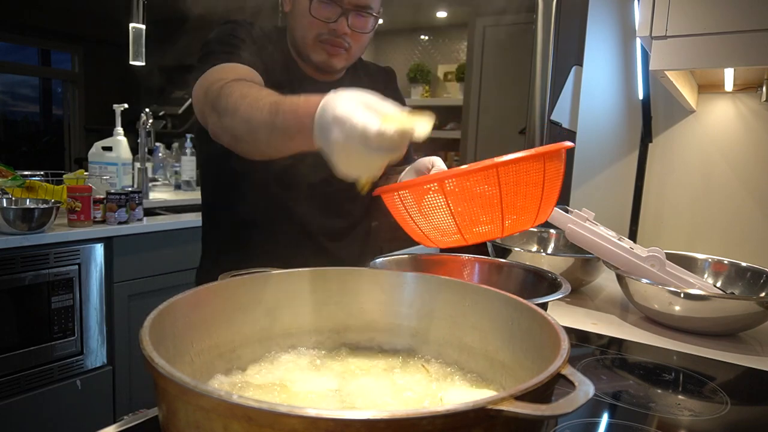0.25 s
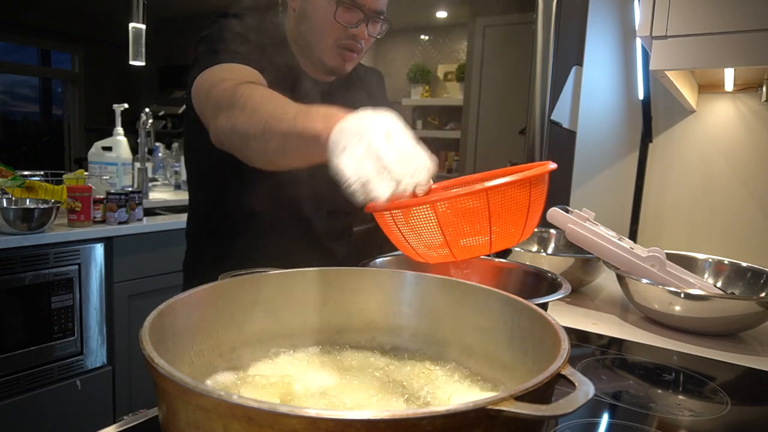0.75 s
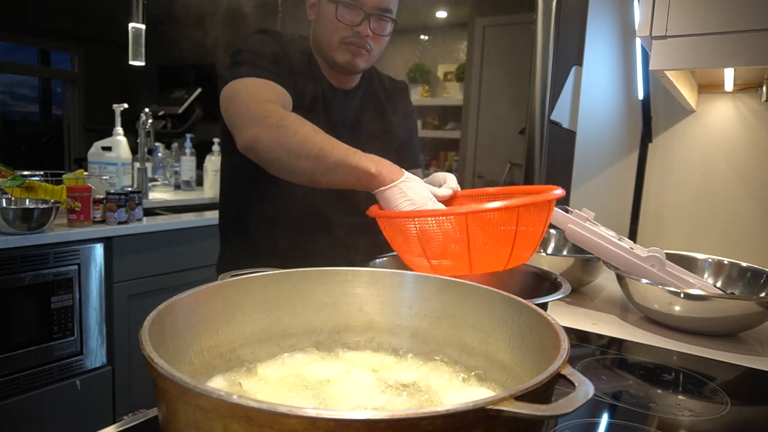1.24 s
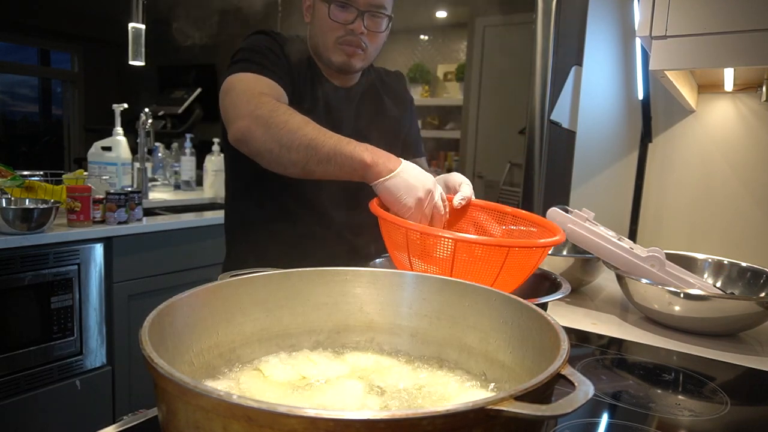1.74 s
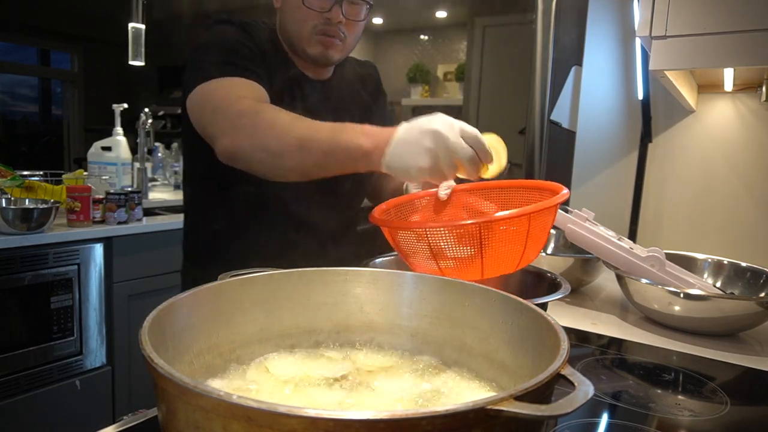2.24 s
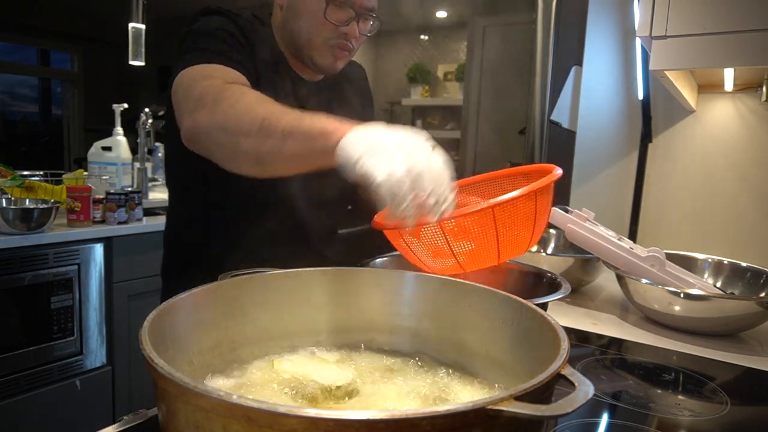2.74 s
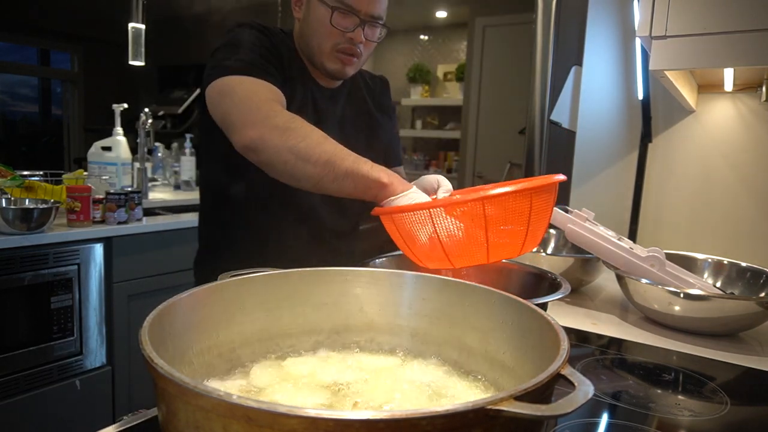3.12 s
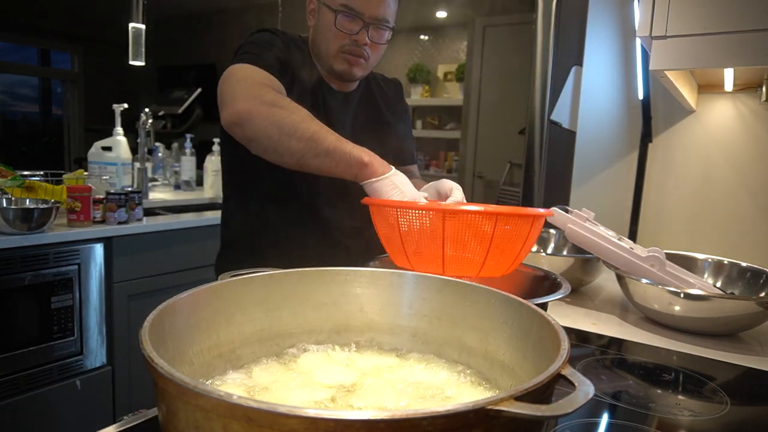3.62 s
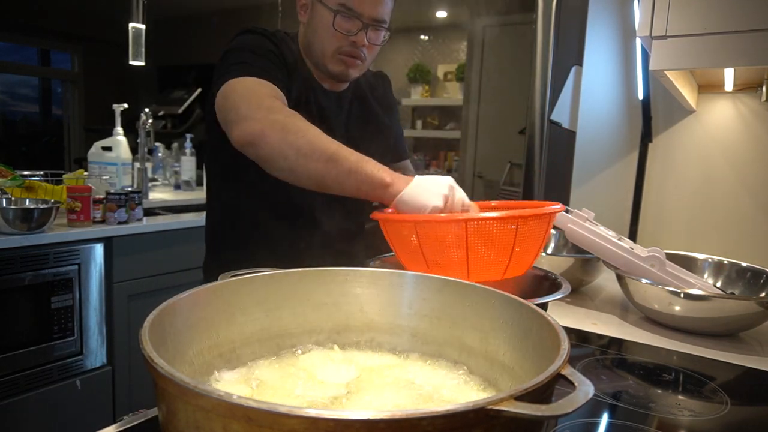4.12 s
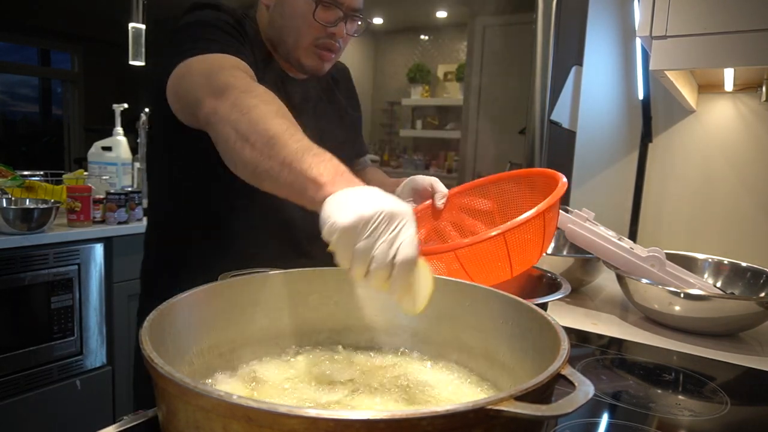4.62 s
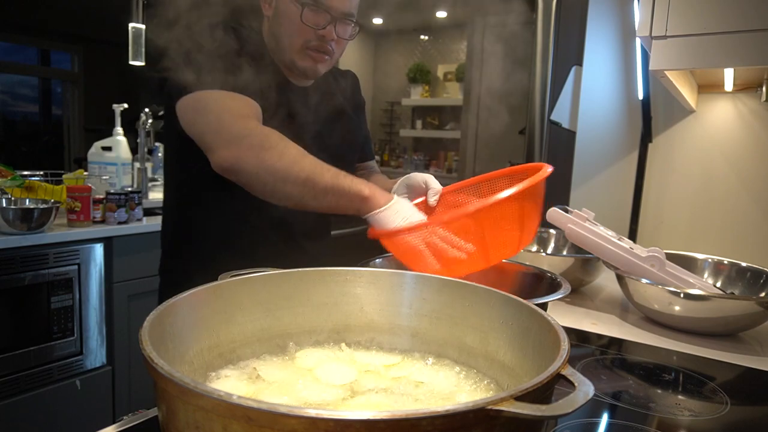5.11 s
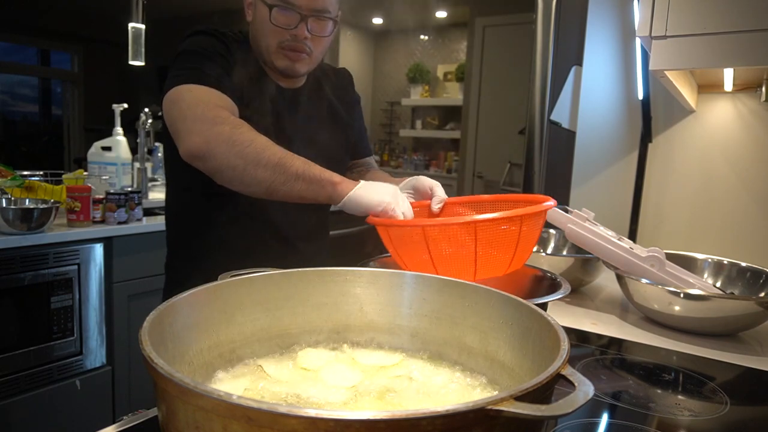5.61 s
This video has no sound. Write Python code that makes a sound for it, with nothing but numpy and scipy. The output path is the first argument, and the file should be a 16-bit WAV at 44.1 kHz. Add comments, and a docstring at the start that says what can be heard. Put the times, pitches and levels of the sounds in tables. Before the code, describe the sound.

Hot oil sizzles and bubbles steadily around potato slices in a metal pot, crackling and spitting close by over a faint rumble.

```python
"""Hot oil fries potato slices in a wide metal pot in a home kitchen.
Steam bubbles burst at the surface: large ones glug, middling ones plip and pop, the smallest fizz.
Steam pockets gulp up from under the slices and water drops spit. Pot and room ring with the bursts,
over a faint stove rumble. A limiter ducks the sizzle briefly on the loudest bursts."""
import sys
import numpy as np
from scipy import signal
from scipy.fft import rfft, irfft, next_fast_len
from scipy.io import wavfile
from scipy.ndimage import uniform_filter1d, minimum_filter1d

SR = 44100
rng = np.random.default_rng(int(sys.argv[2]) if len(sys.argv) > 2 else 0)


def wrap_up_sound(samples):
    """Save the sound to the file named by the first command line argument, as 16-bit audio."""
    columns = np.atleast_2d(samples).T
    # keep every value between -1 and 1, then stretch to whole-number steps
    tamed = np.clip(columns, -1, 1)
    steps = np.round(tamed * 32767).astype(np.int16)
    wavfile.write(sys.argv[1], SR, steps)


N = 258426
TIME_S = np.arange(N) / SR
FFT_SIZE = next_fast_len(N + SR)
FREQS_HZ = np.maximum(np.fft.rfftfreq(FFT_SIZE, 1 / SR), 1)


def from_db(db):
    return 10 ** (np.asarray(db) / 20)


def unit_rms(x):
    return x / np.sqrt(np.mean(x ** 2) + 1e-20)


def curve_db(points):
    """Rows of (Hz, dB) interpolated over log frequency."""
    hz, db = np.transpose(points)
    return np.interp(np.log(FREQS_HZ), np.log(hz), db)


def filtered(x, gain):
    """Apply a gain per frequency."""
    return irfft(rfft(x, FFT_SIZE) * gain, FFT_SIZE)[..., :N]


def drift(corner_hz, hop=40):
    """Slow random wander, rms about 1."""
    pole = np.exp(-2 * np.pi * hop * corner_hz / SR)
    noise = rng.standard_normal(N // hop + 2002)
    slow = signal.lfilter([1], [1, -2 * pole, pole * pole], noise)[2000:]
    return np.interp(np.arange(N) / hop, np.arange(len(slow)), unit_rms(slow))


def add(out, start_s, sound):
    at = max(0, round(start_s * SR))
    out[:, at:at + sound.shape[1]] += sound[:, :N - at]


def scattered(low_hz, high_hz, count):
    """One random burst per equal time slot. Each row: start in seconds, pitch in Hz, size 0-1."""
    offset, pitch, size = rng.random((count, 3)).T
    start_s = (np.arange(count) + offset) / count * TIME_S[-1]
    return np.transpose([start_s, low_hz * (high_hz / low_hz) ** pitch, size])


# Air resonances of the pot. Each row: centre in Hz, width in Hz, gain in dB.
POT_MODES = [(230, 50, 3.5), (317, 26, 5.5), (374.4, 22.7, 9.5), (836.4, 45, 14.5), (1068, 97, 13.5),
             (1300, 28, 9.5), (1285, 32, 13), (1440, 38, -2.5), (2840, 26, -3), (4074, 260, -1),
             (7540, 320, 1)]


def pot_air():
    """Complex gain of the air in the pot: each resonance lifts or dips a narrow band and rings on."""
    return 1 + sum((from_db(db) - 1) / (1 + 1j * hz / width_hz * (FREQS_HZ / hz - hz / FREQS_HZ))
                   for hz, width_hz, db in POT_MODES)


# Broad colour of the sizzle. Each row: frequency in Hz, gain in dB.
SIZZLE_COLOUR = [(230, -3.5), (400, -6), (590, -3), (720, -17.5), (1150, -20), (1400, -9.5), (1900, -4.5),
                 (2900, -7.5), (4000, -6.5), (5600, -19), (7300, -15), (8700, -20.5), (11000, -20.5),
                 (15500, -22.5)]


def bubble_swarm(low_hz, high_hz, per_s, size_db, cycles, surge_db, spread, pitches):
    """Bubbles of random size, pitch and place burst and ring in the pot; rms 1."""
    at = np.flatnonzero(rng.random(N) < per_s / SR)
    burst_db = size_db * np.minimum(rng.exponential(1, N), 3.2) + surge_db
    size = from_db(burst_db[at]) * rng.choice([-1, 1], N)[at]
    pan = spread * rng.standard_normal(N)[at]
    pitch_index = rng.integers(0, pitches, N)[at]
    out = np.zeros((2, N))
    for k, hz in enumerate(np.geomspace(low_hz, high_hz, pitches)):
        own = pitch_index == k
        clicks = np.full((2, N), 1e-18)
        clicks[:, at[own]] = size[own] * np.array([1 + pan[own], 1 - pan[own]])
        radius, angle = from_db(-60 * hz / (cycles * SR)), 2 * np.pi * hz / SR
        ring = signal.lfilter([1, 0, -1], [1, -2 * radius * np.cos(angle), radius * radius], clicks)
        out += hz * ring  # small bubbles die sooner, so they start stronger
    return unit_rms(filtered(out, from_db(curve_db(SIZZLE_COLOUR)) * pot_air()))


# How hard the oil boils. Each row: time in seconds, vigour in dB about the usual.
BOIL_VIGOUR = [(0.0, -0.5), (0.4, -3), (1.65, -0.8), (2.05, 0), (2.5, -2.5), (3.0, 1.6), (3.95, -1.5),
               (4.45, 2), (5.1, 1.5), (5.5, 2.2), (5.86, 2.3)]
# Wet slices landing in the oil. Each row: start in seconds, peak change of the fizz in dB.
SLICE_DROPS = [(0.72, 3), (2.62, 0.7), (4.85, -1.5)]


def boiling(glug_db=-25, plip_db=-21, fizz_db=-27.5, flare_rise_s=0.16):
    """Glugs, plips and fizz follow the boil and surge together; the fizz flares or dips as slices land."""
    vigour_db = np.interp(TIME_S, *np.transpose(BOIL_VIGOUR))
    flare_db = 0
    for start_s, change_db in SLICE_DROPS:
        age = np.maximum(TIME_S - start_s, 0) / flare_rise_s
        flare_db += change_db * age * np.exp(1 - age)
    surge = drift(22)
    glugs = bubble_swarm(229, 1092, per_s=1200, size_db=2, cycles=13.3,
                         surge_db=1.4 * surge + 0.82 * drift(27), spread=0.51, pitches=16)
    plips = bubble_swarm(1069, 6150, per_s=3400, size_db=3, cycles=29.4,
                         surge_db=1.34 * surge, spread=0.58, pitches=40)
    fizz = bubble_swarm(4710, 15400, per_s=15000, size_db=3, cycles=19.7,
                        surge_db=1.2 * surge, spread=0.83, pitches=22)
    return (from_db(glug_db + vigour_db) * glugs
            + from_db(plip_db + 0.29 * vigour_db) * plips
            + from_db(fizz_db + 0.85 * vigour_db + flare_db) * fizz)


# Spectrum of the rumble. Each row: frequency in Hz, gain in dB.
RUMBLE_COLOUR = [(15, -20), (32, -9), (45, 3), (62, -11), (90, -7), (135, 0), (180, -9), (400, -26)]


def stove_rumble(level_db=-46, wander_db=2):
    """Low, wavering noise of stove and kitchen."""
    noise = filtered(rng.standard_normal(N), from_db(curve_db(RUMBLE_COLOUR)))
    return unit_rms(noise) * from_db(level_db + wander_db * drift(10))


def bubble(t, hz, cycles, rise=0.081, opening_cycles=0.27):
    """A cavity rings, falling 60 dB over `cycles`; the pitch climbs as the hole in its film widens."""
    turns = hz * np.maximum(t, 0)
    envelope = (1 - np.exp(-turns / opening_cycles)) * np.exp(-np.log(1000) * turns / cycles)
    glide = 1 + rise * (np.tanh(turns / cycles) - 0.2)
    return envelope / (envelope.max() + 1e-12) * np.sin(2 * np.pi * turns * glide)


def pop(t, hz, cycles, snap_db=-9, snap_hz=3300, snap_cycles=4):
    """A bubble's film tears with a short snap, and its cavity rings."""
    return bubble(t, hz, cycles) + from_db(snap_db) * bubble(t, snap_hz, snap_cycles)


def in_kitchen(sound, pan, near_t60_s=0.055, near_db=-0.5, room_t60_s=0.089, room_db=-4.5):
    """A burst reaches each side directly, off pot wall and worktop, then through the room."""
    t = TIME_S[:SR // 5]
    near = np.exp(-np.log(1000) * t / near_t60_s) * (t > 0.002)
    room = np.exp(-np.log(1000) * t / room_t60_s) * (t > 0.012)
    envelope = np.hypot(from_db(near_db) * near / np.linalg.norm(near),
                        from_db(room_db) * room / np.linalg.norm(room))
    paths = envelope * rng.standard_normal((2, len(t)))
    paths[:, 0] += [1 + pan, 1 - pan]
    return signal.fftconvolve(paths, sound[None], axes=1)


def middling_pops(floor_db=-14, range_db=6, rarity=1.9, t60_s=0.009, spread=0.15):
    """Middling bubbles burst all over the oil; most are faint, a few stand out."""
    out, t = np.zeros((2, N)), TIME_S[:SR // 25]
    for start_s, hz, size in scattered(1650, 4320, count=130):
        sound = from_db(floor_db + range_db * size ** rarity) * pop(t, hz, t60_s * hz)
        add(out, start_s, in_kitchen(sound, spread * rng.standard_normal()))
    return out


# The loudest pops, set one by one. Each row: start in seconds, pitch in Hz, relative level in dB.
LOUD_POPS = [(0.142, 1295, -7.5), (0.286, 2640, -10.5), (0.319, 2510, -6), (0.668, 1460, -9.5),
             (0.681, 2020, -9), (0.901, 2050, -10.5), (1.162, 1300, -5.5), (1.176, 2630, -7),
             (1.309, 2680, -6), (1.349, 1700, -9.5), (1.587, 3520, -4.5), (1.677, 1470, -6.5),
             (1.902, 1510, -6.5), (2.118, 3540, -10.5), (2.377, 3440, -4.5), (2.396, 1830, -6),
             (2.432, 2560, -10), (2.542, 2590, -12.5), (2.765, 3480, -12), (3.099, 1270, -10.5),
             (3.152, 2630, -7), (3.33, 1650, -3.5), (3.492, 1870, -4.5), (3.538, 1850, -9),
             (3.618, 1550, -4.5), (3.929, 2000, -9.5), (3.98, 1430, -10), (4.799, 1100, -11.5),
             (4.827, 2730, -9), (5.353, 3300, -10), (5.584, 1720, -2.5), (5.66, 1300, -11)]


def loud_pops(gain_db=3.5, spread=0.084):
    """The loudest bubbles burst one by one; higher ones ring for more cycles."""
    out, t = np.zeros((2, N)), TIME_S[:SR // 25]
    pans = spread * rng.standard_normal(len(LOUD_POPS))
    for (start_s, hz, db), pan in zip(LOUD_POPS, pans):
        sound = pop(t, hz, cycles=24 * (hz / 1500) ** 0.57)
        add(out, start_s, from_db(db + gain_db) * in_kitchen(sound, pan))
    return out


# Steam escaping from under the slices. Each row: start in seconds, pitch in Hz, relative level in dB.
STEAM_POCKETS = [(0.234, 377, -17.5), (0.606, 290, -26), (0.915, 453, -24), (1.02, 735, -20),
                 (1.1, 553, -24.5), (1.424, 1060, -20), (1.836, 540, -19.5), (2.005, 940, -20),
                 (2.221, 600, -25), (2.469, 1190, -19), (2.786, 790, -20), (3.085, 745, -25),
                 (3.692, 1210, -20), (4.012, 1000, -18), (4.05, 306, -22.5), (4.137, 336, -23.5),
                 (4.43, 1150, -19.5), (4.866, 316, -22.5), (4.937, 384, -24)]


def gulps(gain_db=7, cycles=10, breakup_s=0.019, scatter=0.3, climb=0.12, trail_db=-5, count=7):
    """A steam pocket opens with one big bubble, then breaks into a quick run of mostly higher ones."""
    out, t = np.zeros((2, N)), TIME_S[:SR // 8]
    for start_s, hz, db in STEAM_POCKETS:
        lags = (np.arange(count) + 0.5 + rng.random(count)) / count
        trail_hz = hz * np.exp(climb + scatter * rng.permutation(np.linspace(-1.5, 1.5, count)))
        trail = sum(np.exp(-0.6 * lag) * bubble(t - lag * breakup_s, pitch_hz, cycles)
                    for lag, pitch_hz in zip(lags, trail_hz))
        sound = bubble(t, hz, cycles) + from_db(trail_db) * trail
        add(out, start_s, from_db(db + gain_db) * in_kitchen(sound, pan=0))
    return filtered(out, np.sqrt(pot_air()))


# The loudest water drops. Each row: start in seconds, pitch in Hz, level in dB, spray decay in seconds.
WATER_DROPS = [(0.603, 13200, -9, .003), (0.81, 8800, -12, .003), (1.128, 6200, -8, .005),
               (1.148, 13000, -11, .004), (1.471, 10900, -10.5, .007), (1.929, 13000, -11, .003),
               (2.688, 14000, -13, .008), (3.056, 12500, -9, .003), (3.275, 8800, -6.5, .011),
               (3.596, 13700, -12, .004), (4.966, 10400, -7, 0.016), (5.764, 8600, -11.5, .004)]


def spits(cycles=17, band_ratio=1.33, spray_db=-15, spread=0.21, small_db=-17, small_decay_s=0.0045):
    """A drop flashes to steam with a snap and a hiss of oil spray; small drops go off at random."""
    out, t = np.zeros((2, N)), TIME_S[:SR // 12]
    small_drops = [(start_s, hz, small_db + 4 * size, small_decay_s)
                   for start_s, hz, size in scattered(6200, 18000, count=12)]
    for start_s, hz, db, decay_s in list(WATER_DROPS) + small_drops:
        edges_hz = [hz / band_ratio, min(hz * band_ratio, 0.45 * SR)]
        band = signal.butter(2, edges_hz, "band", fs=SR, output="sos")
        hiss = unit_rms(signal.sosfilt(band, rng.standard_normal(len(t))))
        sound = bubble(t, hz, cycles) + from_db(spray_db) * hiss * np.exp(-t / decay_s)
        add(out, start_s, from_db(db) * in_kitchen(sound, spread * rng.standard_normal()))
    return out


# First reflections off pot wall, hob and cupboards. Each row: delay in seconds, gain in dB.
REFLECTIONS = [(.0013, -96), (.0041, -25.5), (.0068, -19.5), (0.011, -19.5), (0.0166, -16.5)]


def with_echoes(x):
    """Nearby hard surfaces add a few faint echoes."""
    echoes = sum(from_db(db) * np.exp(-2j * np.pi * FREQS_HZ * delay_s) for delay_s, db in REFLECTIONS)
    return filtered(x, 1 + echoes)


# Stereo width. Each row: frequency in Hz, gain of the side signal in dB.
SIDE_GAIN = [(100, -27), (300, -73), (420, -15), (700, -1.5), (1300, -5.5), (2400, -2), (4400, -0.5),
             (15000, -1)]
# Stereo balance. Each row: frequency in Hz, left minus right in dB.
BALANCE = [(500, 0), (1300, -0.5), (2200, -3.2), (4000, -1.6), (8000, -1.8), (13000, -3.7)]


def microphone_pair(x):
    """Long waves reach both microphones alike, short ones differ; the treble leans right."""
    left, right = x
    mid = (left + right) / 2
    side = filtered((left - right) / 2, from_db(curve_db(SIDE_GAIN)))
    lean = from_db(np.outer([0.5, -0.5], curve_db(BALANCE)))
    return filtered(np.array([mid + side, mid - side]), lean)


def scene():
    """Frying oil heard close, cut below the pot's lowest resonance, over a faint rumble."""
    oil = with_echoes(boiling() + middling_pops()) + gulps() + loud_pops() + spits()
    highpass = signal.ellip(5, 1, 19, 228, "high", fs=SR, output="sos")
    return signal.sosfilt(highpass, microphone_pair(oil)) + stove_rumble()


def limiter(x, threshold_db=-11, release_db_per_s=190):
    """The gain drops just ahead of a loud burst, holds briefly and creeps back."""
    power = uniform_filter1d(x ** 2, size=48, axis=1).mean(axis=0)
    level_db = 10 * np.log10(np.maximum(power, 1e-12))
    held_db = -minimum_filter1d(np.minimum(threshold_db - level_db, 0), size=601, origin=256)
    release_db = release_db_per_s * TIME_S
    cut_db = np.maximum.accumulate(held_db + release_db) - release_db
    return x * from_db(-uniform_filter1d(cut_db, size=89))


def record(dry, cutoff_hz=15800):
    """Limiter, then a steep low-pass."""
    lowpass = signal.ellip(12, 0.1, 90, cutoff_hz, fs=SR, output="sos")
    return signal.sosfilt(lowpass, limiter(dry))


dry = scene()
out = record(dry)
wrap_up_sound(out)
```